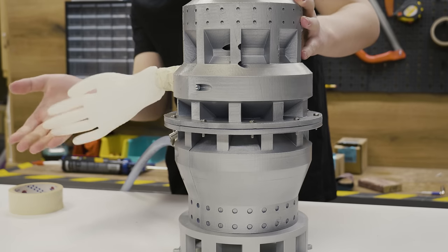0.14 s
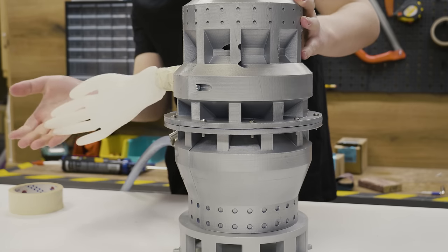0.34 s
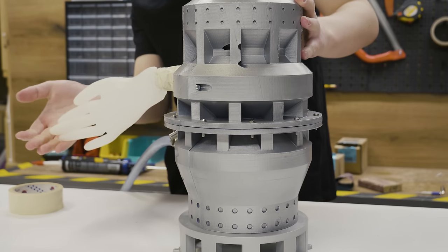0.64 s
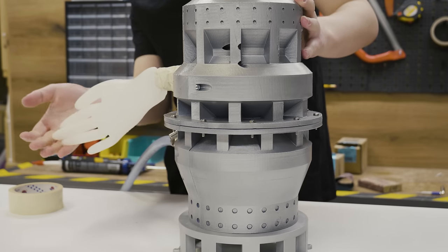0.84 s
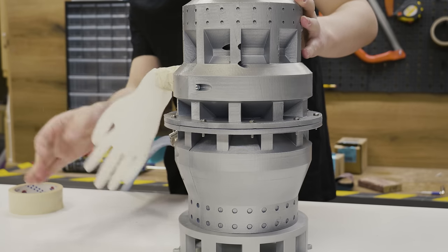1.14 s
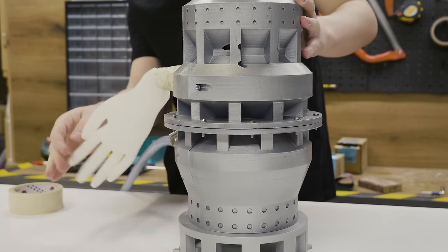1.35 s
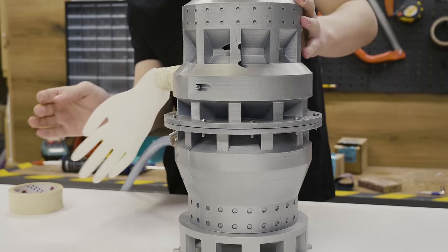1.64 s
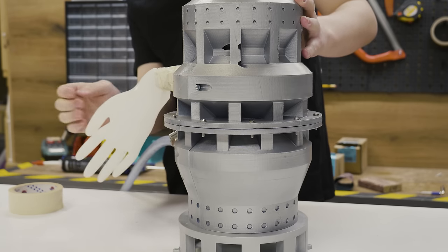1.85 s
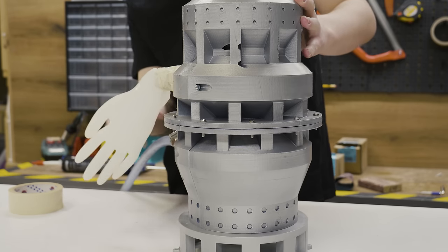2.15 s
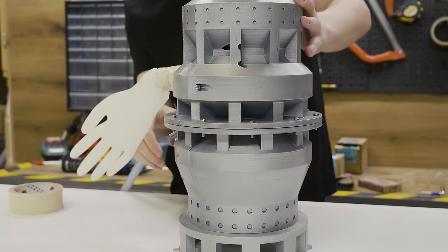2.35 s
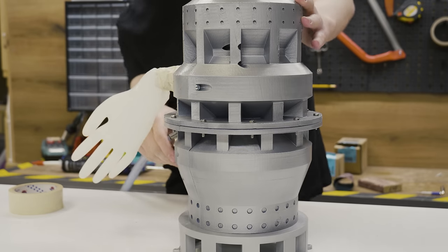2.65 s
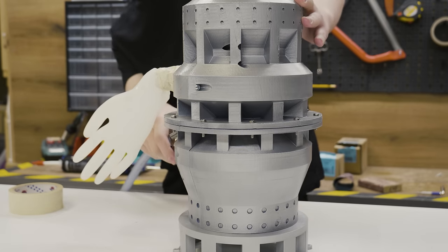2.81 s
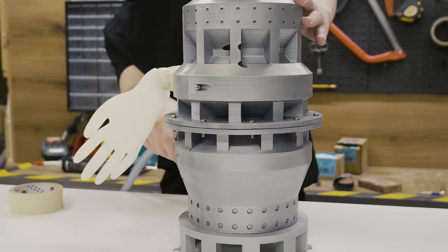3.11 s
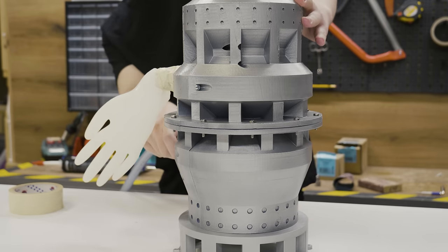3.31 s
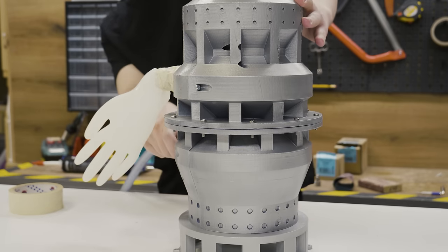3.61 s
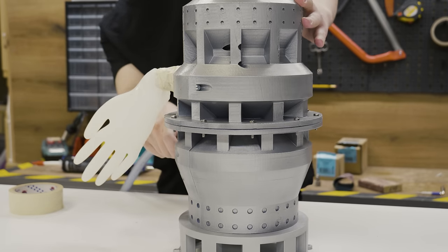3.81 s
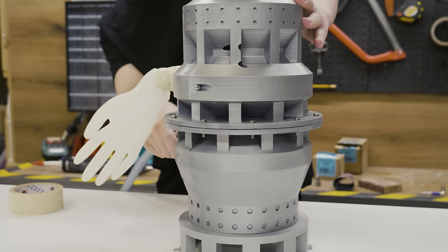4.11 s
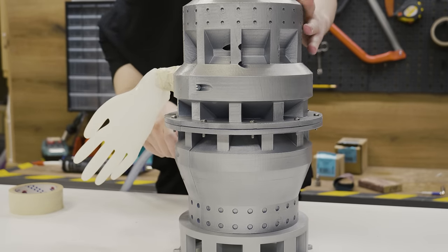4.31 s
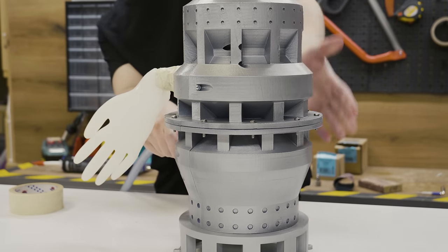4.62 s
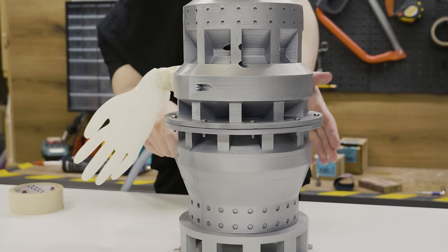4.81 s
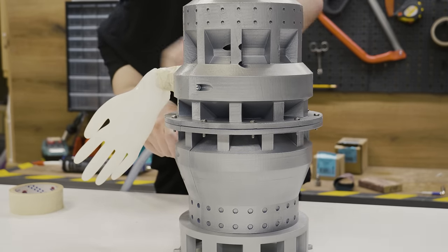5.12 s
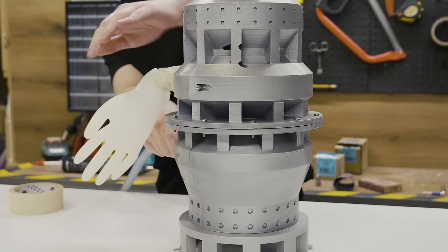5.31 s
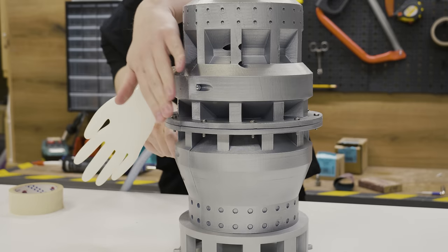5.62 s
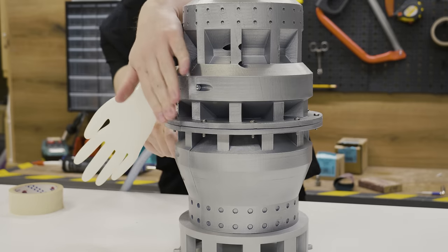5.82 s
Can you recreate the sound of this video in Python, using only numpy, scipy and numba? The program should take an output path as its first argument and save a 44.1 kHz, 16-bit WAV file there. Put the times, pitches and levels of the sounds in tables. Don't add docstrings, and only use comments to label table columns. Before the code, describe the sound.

A small turbine blown by compressed air runs continuously on a workbench, close to one microphone, dry and centred. At 0 s there is bright metallic hiss, hollow chamber roar around 600 Hz and only a vague, breathy tone near 780 Hz, which almost vanishes at 0.2 s. The shaft hum rises from about 49 to 57 Hz by 1.8 s, with blade hum near 400 to 455 Hz and a faint higher whine fading around 1.5 s. From 1.2 s a whistle swells, sliding down to about 720 Hz, with small stutters until 2 s. Between 2 and 4.3 s it is strong, clearer and slightly wavering, with faint overtones; the hiss ducks beneath it and the rotor slows to around 50 Hz. From 4.4 s short dropouts roughen it. By 5.9 s it drifts up to 750 Hz, weak and blurred, amid rushing air, without stopping.

```python
import sys
import numpy as np
from scipy import signal
from scipy.fft import rfft, irfft
from scipy.io import wavfile
from scipy.ndimage import uniform_filter1d
from numba import njit

SR = 44100
rng = np.random.default_rng(int(sys.argv[2]) if len(sys.argv) > 2 else 0)


def nominal_scale(level):
    x = np.asarray(level, float) / 20
    return 10 ** x


def store_pcm(level_fs):
    pcm = np.round(np.clip(level_fs, -1, 1) * 32767).astype(np.int16)
    wavfile.write(sys.argv[1], SR, np.atleast_2d(pcm).T)


N = 262615

# t/s, whistle level over hiss/dB, whistle f/Hz, looseness of lock/1, flow level/dB
AIR_SUPPLY = [(0.0, -3, 787.0, .55, 5.5), (0.2, -18, 775.0, 0.72, 9), (0.8, -1, 755.0, 0.9, 8.5),
              (1.15, 5, 733, 0.99, 5.5), (1.3, 9, 745, 0.53, 6), (1.55, 13.5, 731.0, 0.54, 6.5),
              (1.9, 14.5, 722.0, 0.44, 8), (2.05, 14.5, 721, 0.24, 8), (2.5, 13.5, 721.0, 0.16, 10),
              (2.75, 11, 716.0, .3, 10), (3.15, 12.5, 720.0, 0.14, 11), (3.45, 9.5, 716.0, 0.35, 10),
              (3.7, 13.5, 720.0, 0, 9.5), (3.95, 9.5, 714, 0.08, 7), (4.3, 10.5, 718.0, 0.29, 9),
              (4.85, 7, 719.0, 0.56, 6), (5.25, 9, 727.5, 0.58, 7), (5.95, 2.5, 750.0, 0.88, 3)]
# t/s, shaft f/Hz, impeller load level/dB
SHAFT_SPIN = [(0.0, 49.1, 3.5), (0.5, 51.92, 3.5), (0.75, 53.1, 4.5), (1.0, 55.5, 6), (1.5, 56.81, 6),
              (1.8, 57.09, 4), (2.25, 55.71, 2.5), (2.75, 53.15, -0.5), (3.25, 49.6, -2.5),
              (3.75, 49.6, -0.5), (4.25, 50.64, -2), (5.0, 51.3, -2), (5.5, 50.72, -1), (5.95, 50.39, -2.5)]
# f/Hz, density level/dB
JET_SPECTRUM = [(650, -30), (1100, -12), (1900, -8.5), (2600, -7), (3800, -6.5), (5000, -4), (7200, -8.5),
                (8700, -11.5), (13000, -9.5), (16000, -30)]
# f/Hz, width/Hz, level/dB
CASING_MODES = [(1142, 30, -11), (1640, 180, -8.5), (2190, 69, -1), (2380, 150, -6), (2994, 380, -4),
                (3557, 110, -2.5), (3950, 70, -6), (4140, 103, -1), (4320, 160, -5.5), (4770, 315, 1.5),
                (5065, 85, 2), (5250, 250, -11), (5540, 290, -3.5), (6290, 380, -5.5), (6640, 130, -7),
                (7670, 190, -6.5), (8310, 110, -8.5), (8400, 94, -9), (9370, 380, -6.5), (10400, 250, -9.5),
                (10450, 150, -12), (10960, 300, -8.5), (11380, 220, -5.5), (12150, 200, -14),
                (12900, 530, -4.5), (13580, 180, -9), (13760, 250, -4.5), (14950, 330, -8.5),
                (15400, 400, -5.5)]
# f/Hz, density level/dB
ROAR_SPECTRUM = [(300, -36), (370, -30.5), (460, -5.5), (600, 1), (780, -2), (950, -4), (1150, -16),
                 (1800, -26.5)]
# f/Hz, density level/dB
WINDAGE_SPECTRUM = [(32, -27), (46, 14), (62, 2), (80, -7), (120, -9), (200, -7.5), (350, 1), (480, 1),
                    (700, -35)]
# t/s, depth/dB, length/ms
LOCK_SLIPS = [(1.334, 6, 4.5), (1.401, 5, 15), (1.467, 6, 6.5), (1.699, 4, 3.9), (1.77, 7, 26),
              (1.835, 6, 7), (1.897, 6.5, 15), (1.949, 6, 5.3), (3.406, 3, 5.5), (3.928, 7.5, 9.4),
              (4.13, 5, 11.4), (4.404, 17, 4.8), (4.731, 18, 5.6), (4.815, 6, 8.1), (4.91, 4, 26),
              (4.944, 10, 7.2), (4.968, 9, 6.5), (5.087, 4, 5.8), (5.111, 12, 7.5), (5.26, 3, 3.5),
              (5.287, 3, 6.4), (5.331, 5, 16.3), (5.381, 5, 6.7), (5.468, 3, 5.8), (5.526, 7, 18),
              (5.6, 3.5, 58), (5.691, 0, 17), (5.758, 6, 4), (5.836, 9, 6)]
# t/s, half length/s, level over hiss/dB
BEARING_BUZZES = [
    (0.05, 0.17, -25),
    (0.518, 0.186, -20.5),
    (2.85, 0.26, -37),
    (3.5, 0.32, -27.5),
    (4.25, 0.21, -30.5),
    (5.101, .25, -35),
]
HISS_DB = -24


def level(x, db):
    rms = np.sqrt(np.mean(np.abs(x) ** 2))
    return x * nominal_scale(db) / rms


def columns(table):
    s, *rest = np.transpose(table)
    t = np.arange(N) / SR
    return [np.interp(t, s, c) for c in rest]


def walk(rate):
    hold = int(SR / rate)
    x = np.repeat(rng.standard_normal(N // hold + 1), hold)
    x = uniform_filter1d(uniform_filter1d(x, hold), hold)[:N]
    return x / x.std()


def slopes(points):
    f, db = np.transpose(points)
    return lambda hz: nominal_scale(np.interp(np.log(hz), np.log(f), db, left=-90))


def rings(modes):
    def gain(hz):
        return np.sqrt(sum(nominal_scale(2 * db) / (1 + (1.38 * (hz - f) / width) ** 2) ** 2
                           for f, width, db in modes))
    return gain


def turbulence(gain, shared_db, own_db):
    hz = np.arange(N // 2 + 1) * SR / N + 1
    colour = rfft(rng.standard_normal(N)) * gain(hz)
    shared = walk(12) + 2.0 * walk(60)
    out = 0
    for octave in np.arange(4, 15, .5):
        window = np.clip(1 - 2 * np.abs(np.log2(hz) - octave), 0, 1)
        band = irfft(colour * window, N)
        out = out + band * nominal_scale(shared_db * shared + own_db * walk(9))
    return out


def rotor():
    t = np.arange(N) / SR
    shaft_hz, load_db = columns(SHAFT_SPIN)
    bench_detuning = (shaft_hz - 56.8) / 1.7
    shake = nominal_scale(-8.5) / (1 + bench_detuning ** 2) + nominal_scale(-11) * np.exp(-t / 0.1)
    buzz_floor_db = -46.5
    buzz = nominal_scale(buzz_floor_db) + sum(nominal_scale(db) * np.exp(-((t - s) / half) ** 2)
                                    for s, half, db in BEARING_BUZZES)
    blade = nominal_scale(-17 + 1.46 * load_db)
    spin_up_ends_s, fade_s = 1.45, 0.096
    stator = nominal_scale(-9) / (1 + np.exp((t - spin_up_ends_s) / fade_s))
    turn = 2 * np.pi * np.cumsum(shaft_hz) / SR
    lines = 0
    for order, size in zip((1, 3, 8, 16), (shake, buzz, blade, stator)):
        flutter = nominal_scale(HISS_DB + (-0.3 + 0.2 * order) * walk(7.4))
        sine = np.sin(order * turn + 0.038 * order * walk(22))
        lines = lines + np.sqrt(2) * size * flutter * sine
    windage = level(turbulence(slopes(WINDAGE_SPECTRUM), .3, 0.35), -42)
    return lines + nominal_scale(load_db) * windage


def jets():
    load_db = columns(SHAFT_SPIN)[1]
    nozzles = level(turbulence(slopes(JET_SPECTRUM), 0.12, 1.0), -28.5)
    casing = level(turbulence(rings(CASING_MODES), 0.13, 1.0), -24.5)
    hiss = nominal_scale(0.49 * load_db) * nozzles + casing
    treble = signal.butter(1, 8000, "high", fs=SR, output="sos")
    fine = signal.sosfiltfilt(treble, hiss)
    hiss = hiss + (nominal_scale(-2.26 + 0.71 * load_db) - 1) * fine
    roar = level(turbulence(slopes(ROAR_SPECTRUM), 0.36, 0.32), -23.5)
    return hiss + nominal_scale(0.44 * load_db) * roar


def whistle(over_db, hz, loose):
    width_hz, wobble_hz = 5.03, 38.5
    t = np.arange(N) / SR
    spread = np.sqrt(2 * np.pi * width_hz * (1 + 6 * loose ** 2) / SR)
    drift = np.cumsum(rng.standard_normal(N) * spread)
    drift = uniform_filter1d(uniform_filter1d(drift, size=100), size=100)
    phase = 2 * np.pi * np.cumsum(hz) / SR + drift
    pole = np.exp(-2 * np.pi * wobble_hz / SR)
    noise = rng.standard_normal(N) + 1j * rng.standard_normal(N)
    eddies = level(signal.lfilter([1], np.poly([pole, pole]), noise), 0)
    loose = np.clip(0.72 * loose, 0, 1)
    slip_db = sum(1.15 * db * np.exp(-(1300 * (t - s) / ms) ** 2) for s, db, ms in LOCK_SLIPS)
    z = (np.sqrt(1 - loose ** 2) + loose * eddies) * np.exp(1j * phase) * nominal_scale(-slip_db)
    firm = nominal_scale(0.22 * (over_db - 18.5) + 3.0 - 13.3 * loose)
    second = nominal_scale(-27.5) * z ** 2
    third = nominal_scale(-22.5) * z ** 3 / (np.abs(z) + .1)
    tone = z + firm * (second + third)
    return np.sqrt(2) * tone.real * nominal_scale(HISS_DB + over_db)


def scene():
    over_db, hz, loose, flow_db = columns(AIR_SUPPLY)
    spin, air = rotor(), jets()
    loose = np.clip(loose + 0.083 * walk(12), 0, 1)
    tone = whistle(over_db + 0.4 * walk(25.1), hz + 3.212 * walk(45), loose)
    return np.tile((air + tone + spin) * nominal_scale(flow_db), (2, 1))


@njit
def ride(x, attack, release):
    e, out = .1, np.empty(len(x))
    for i in range(len(x)):
        e += (abs(x[i]) - e) * (attack if abs(x[i]) > e else release)
        out[i] = e
    return out


def roll_off(x):
    return signal.sosfilt(signal.butter(12, 17090, fs=SR, output="sos"), x)


def record(dry):
    attack_s, release_s = 0.0018, 0.02
    target_db, ratio, ceiling = -18, 3.37, 0.51
    e = ride(dry[0], 1 / (attack_s * SR), 1 / (release_s * SR))
    held = dry * (nominal_scale(target_db) / e) ** (1 - 1 / ratio)
    held = ceiling * np.tanh(held / ceiling)
    top_cut = signal.ellip(12, .3, 70, 15730, fs=SR, output="sos")
    return roll_off(signal.sosfilt(top_cut, held))


dry = scene()
out = record(dry)
store_pcm(out)
```